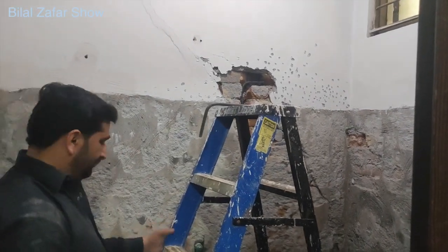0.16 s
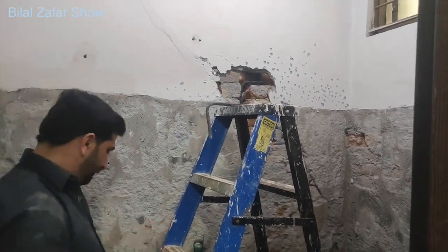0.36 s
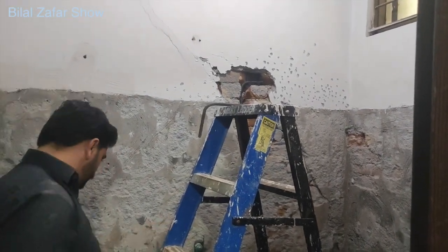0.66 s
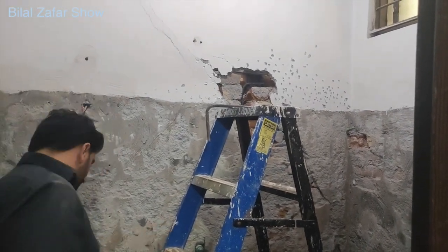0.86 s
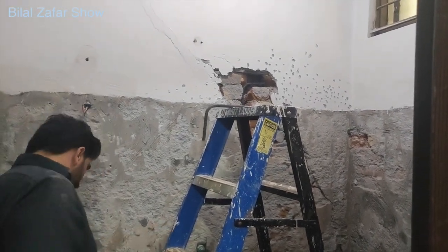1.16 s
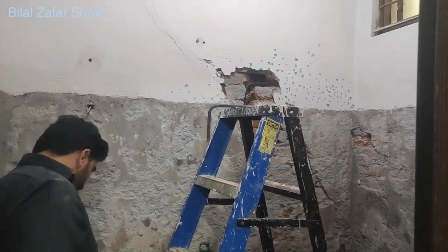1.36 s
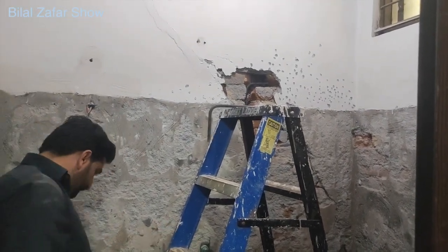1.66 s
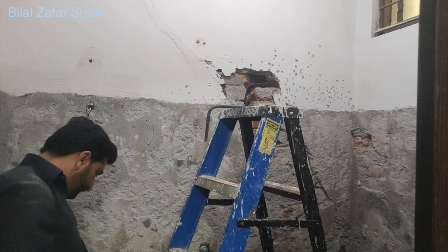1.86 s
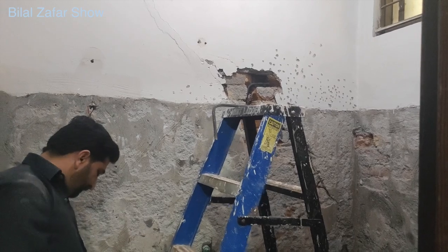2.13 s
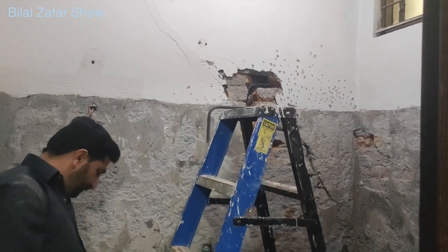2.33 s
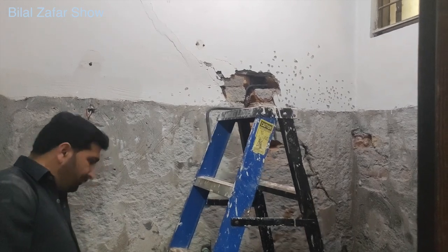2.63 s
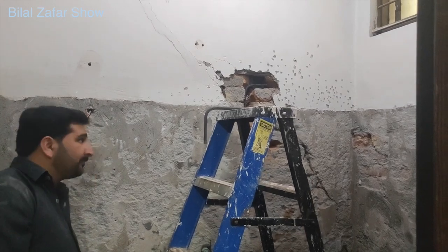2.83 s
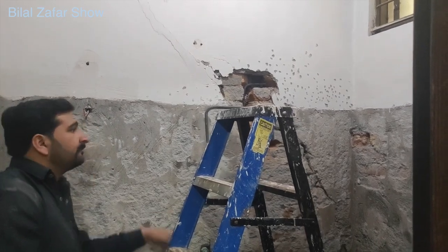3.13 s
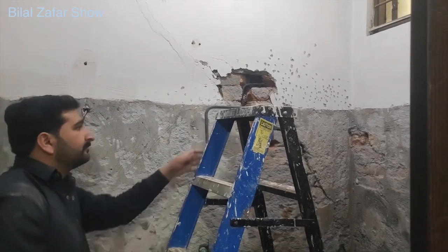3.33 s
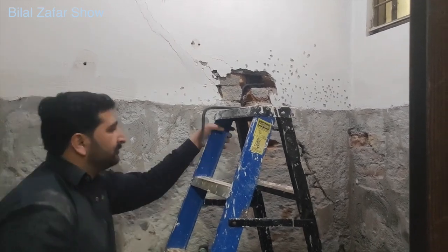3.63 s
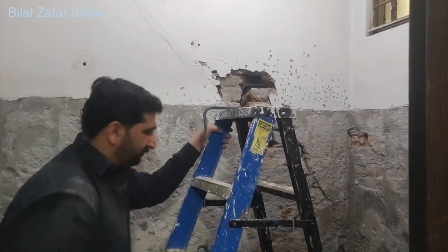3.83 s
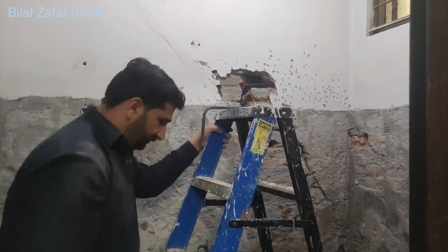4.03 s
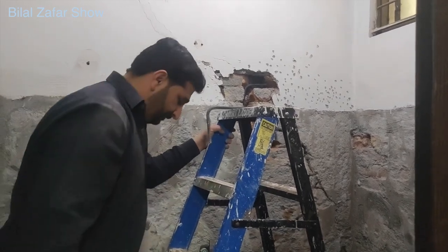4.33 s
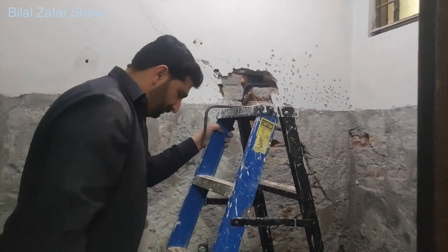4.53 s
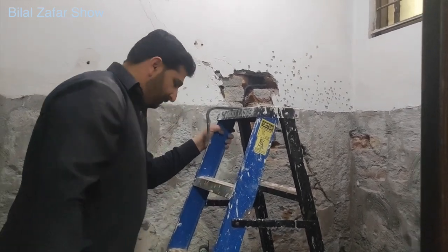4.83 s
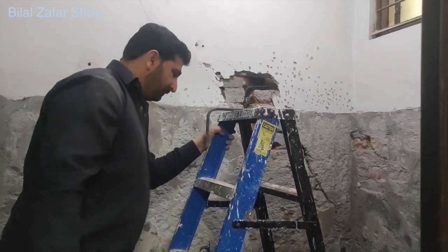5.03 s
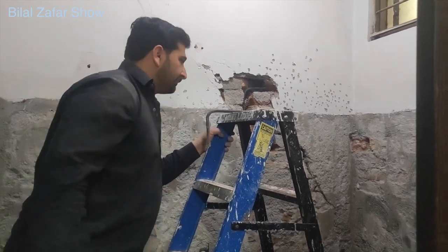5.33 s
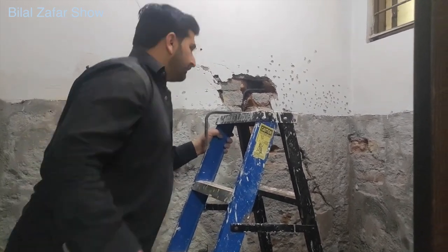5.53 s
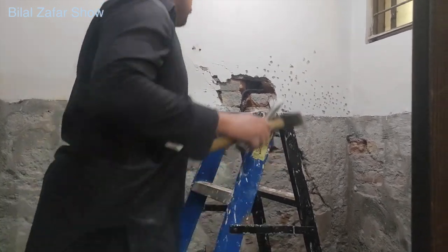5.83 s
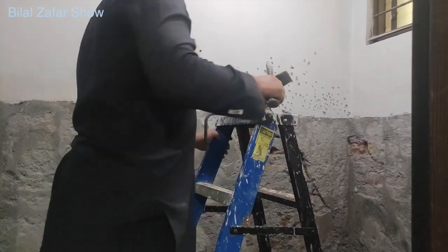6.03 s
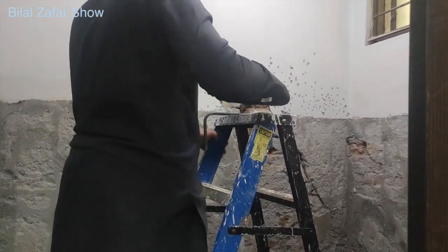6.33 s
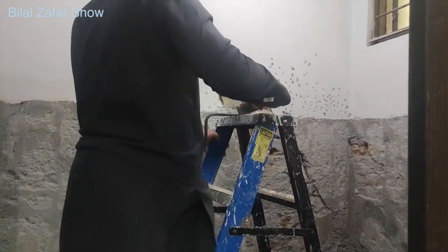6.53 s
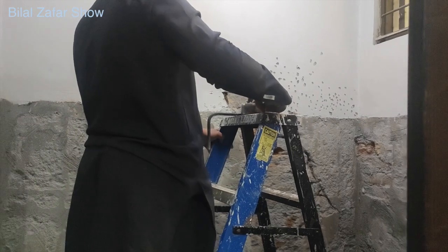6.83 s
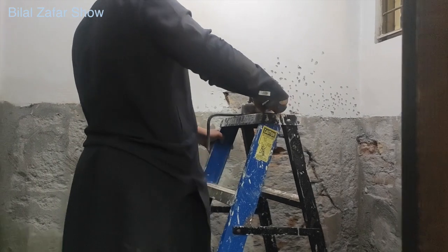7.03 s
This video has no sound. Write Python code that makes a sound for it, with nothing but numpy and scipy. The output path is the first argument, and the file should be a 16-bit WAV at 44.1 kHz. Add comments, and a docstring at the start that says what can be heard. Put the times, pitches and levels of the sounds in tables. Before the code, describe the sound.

Gritty scrapes echo off hard walls as someone picks a hammer and chisel out of rubble across a small room. The microphone is lightly bumped and something creaks twice beside it. After a heavy thud and a stepladder's clack come a faint squeak, a shoe scuff and light clinking. The tools are then laid on the ladder with a scraping, ringing clatter, over a low room rumble.

```python
"""A small, bare masonry room in stereo; the hard walls draw out all but the closest sounds.
Across the room a man gathers hammer and chisel from the rubble: steel and brick bits tip and scrape.
Right at the microphone the housing is bumped and something creaks twice. Something heavy thuds, then
a stepladder clacks. A thin squeak and a scuffing sole follow, and the tools clink in his hand.
Last he lays them on the ladder: they scrape and rattle, the chisel sings and the top plate rings."""
import sys
import numpy as np
from scipy import signal
from scipy.fft import rfft, irfft
from scipy.io import wavfile
from scipy.ndimage import uniform_filter1d

SR = 44100
rng = np.random.default_rng(int(sys.argv[2]) if len(sys.argv) > 2 else 0)


def file_out(sig):
    """Save sig as 16-bit WAV at sys.argv[1]."""
    # one column per channel
    cols = np.atleast_2d(sig).T
    # limit, then scale
    lim = np.clip(cols, -1, 1)
    pcm = np.round(lim * 32767).astype(np.int16)
    wavfile.write(sys.argv[1], SR, pcm)


N = 316197
TIME = np.arange(N) / SR
SECOND = TIME[:SR]
SAMPLES_50_MS = int(.05 * SR)

# Levels in the tables are at the source, ahead of room, mix gains and microphone.
# the building's rumble and hiss: freq_hz, gain_db
ROOM_TONE = [(15, -1), (25, -7), (223, -21), (256, -22.5), (659, -29.5), (911, -28.5), (1160, -26.5),
             (1260, -29), (3340, -33), (4140, -40), (7920, -33.5), (9840, -40.5), (16000, -38.5)]
# decay between the bare walls: freq_hz, t60_s
ROOM_DECAY = [(100, 0.64), (350, 0.9), (1000, 0.76), (2500, 0.53), (5000, 0.37), (8000, 0.33),
              (15000, 0.17)]
# how alike diffuse sound is left and right: freq_hz, correlation
STEREO_LIKENESS = [(60, 0.26), (130, 0.91), (330, 0.89), (700, 0.59), (1400, 0.0042), (2500, 0)]
# colour of the two microphone ports: freq_hz, gain_db
LEFT_PORT = [(330, 0), (620, -0.5), (930, 3.5), (1350, -4), (2000, -4), (2800, 2), (5500, -1), (6700, 5.5),
             (7650, 16.5), (8500, 11.5), (9600, 6.5), (10600, 1)]
RIGHT_PORT = [(930, 0), (1400, 1.5), (2000, -1), (2800, -1.5), (4100, -7), (5200, -7.5), (6300, -3.5),
              (7200, 5), (8000, -49), (9200, -8), (11000, -8)]
# bumps on the microphone's housing: start_s, level_db
HOUSING_BUMPS = [(.102, -40.5), (.152, -38.5), (.641, -38), (1.831, -31)]

# a sole scuffs the dusty floor: start_s, level_db, slide_s
SCUFFS = [(5.319, -33.5, 0.049), (5.365, -32, 0.021)]
# colour of sole on dust: freq_hz, gain_db
SOLE_COLOUR = [(100, -27), (330, -6), (650, -13.5), (1000, -6.5), (1350, 3.5), (1900, -6.5), (3500, -17),
               (12000, -34.5)]
# course of the thin squeak: time_s, pitch_hz, level_db
SQUEAK_PATH = [(4.929, 3700, -88), (4.989, 3625, -50), (5.07, 3540, -53.5), (5.15, 3540, -78)]
# speed of the creak, one list for each of its two strokes: time_s, slips_per_s
CREAK_STROKES = [
    [(1.074, 112), (1.15, 70), (1.22, 44), (1.27, 47), (1.32, 88), (1.41, 198), (1.47, 191), (1.59, 48),
     (1.645, 12)],
    [(1.796, 20.5), (1.895, 35), (1.96, 23), (2.05, 12)],
]
# resonances of the creaking body: freq_hz, width_hz, gain_db
CREAK_BODY = [(2880, 3800, 0.5), (4300, 600, 7), (6060, 570, 5.5), (7760, 210, 3), (9500, 1000, 3)]
# the heavy thud and its rebounds: start_s, level_db
THUDS = [(2.629, -7), (2.660, -8), (2.732, -12), (2.772, -22), (2.822, -22)]
# modes of the thud: pitch_hz, gain_db, t60_s
THUD_MODES = [(182, -10, 0.26), (217.5, 0, 0.21), (267, -5.5, 0.08), (377, -1.5, 0.045), (468, -4, 0.12),
              (486, -12, 0.046)]

# colour of steel on brick: freq_hz, gain_db
GRIT_COLOUR = [(50, -12.5), (150, -4), (300, -3.5), (650, -6), (950, -4), (1700, 0.5), (2700, -3),
               (4200, -8), (9000, -15.5), (16000, -14.5)]
# tools and rubble shift on the floor: start_s, level_db, slide_s, hardness_db (treble gained)
RUBBLE_SHIFTS = [(0.0, -27.5, 0.016, -8.5), (0.173, -29.5, 0.016, -7.5), (0.2606, -25.5, 0.0099, 3),
                 (.600, -28, 0.086, 3.5), (.935, -35.5, 0.021, 1.5), (1.723, -26.5, 0.022, 1.5),
                 (2.082, -19, 0.044, -1), (2.222, -21.5, 0.049, 2), (2.297, -23.5, 0.019, -2),
                 (2.483, -32, 0.028, 8), (2.657, -22.5, 0.023, -1), (3.158, -35.5, .026, 1),
                 (3.404, -34.5, 0.031, 4.5), (3.628, -30, 0.031, 5.5), (4.028, -39, 0.018, 1),
                 (4.545, -32, 0.021, 4.5), (4.810, -42, .015, 2.5), (5.050, -42.5, 0.017, 0.5),
                 (5.370, -33.5, .022, 5.5)]
# slow, dull shuffles through the grit: start_s, level_db, slide_s
SHUFFLES = [(1.105, -37, 0.29), (1.46, -39, 0.2), (1.988, -32, .1), (2.31, -31.5, 0.044),
            (3.10, -43.5, .06), (3.57, -39.5, 0.12), (5.645, -39, 0.039), (6.478, -41.5, 0.22)]

# resonances of the ladder's hollow rails: freq_hz, width_hz, gain_db
RAIL_RESONANCES = [(331, 36, 2.5), (882, 32, 3.5)]
# the ladder's frame clacks: start_s, level_db
CLACKS = [(3.771, -24), (3.776, -12.5)]
# resonances of the frame: freq_hz, width_hz, gain_db
FRAME_RESONANCES = [(495, 117, -4), (923, 34, 2), (991, 70, 4.5), (1300, 270, -3.5), (1742, 42, 2),
                    (2225, 120, -3), (2560, 61, -12), (3380, 180, -11.5), (5430, 3500, -31)]
# hammer and chisel touch in the hand: start_s, level_db
CLINKS = [(5.915, -54), (6.153, -61.5)]
# their ring: pitch_hz, gain_db, t60_s
CLINK_MODES = [(1920, 3, 0.45), (7750, -1, .12)]
# the chisel sings as it slides: start_s, level_db
CHISEL_RINGS = [(6.724, -35.5), (6.745, -31), (6.768, -31.5)]
# its one mode: pitch_hz, gain_db, t60_s
CHISEL_MODE = [(5421, 0, .06)]
# steel edges catch on the ladder's gritty top: start_s, level_db, slide_s, hardness_db (treble gained)
SCRAPES = [(6.573, -19.5, 0.024, -4.5), (6.669, -20, 0.016, 0), (6.735, -17, 0.069, -1.5),
           (6.842, -15.5, 0.026, 4), (6.928, -16, 0.014, 7), (7.022, -24, 0.018, 1.5),
           (7.163, -21.5, 0.008, -3)]
# tools land on the ladder's top: start_s, level_db
LANDINGS = [(6.577, -34), (6.625, -24), (6.85, -24), (6.89, -18.5), (6.932, -13)]
# modes of the top plate: pitch_hz, gain_db, t60_s (shortened in ladder_top)
PLATE_MODES = [(236.4, -4.0, 0.48), (344.4, 8.5, 0.74), (457.0, -2.0, 0.81), (717, -11, 0.32),
               (897, -6.5, 0.55), (978, -1, 0.39), (1280, -4.5, 0.43), (1380, -10, 0.4), (395.6, -3, 0.73)]


def undb(db):
    """Decibels to gain."""
    return 10 ** (np.asarray(db) / 20)


def along(points, hz):
    """Read (freq_hz, value) points on a log-frequency axis."""
    freqs, values = np.transpose(points)
    return np.interp(np.log(np.maximum(hz, 1)), np.log(freqs), values)


def level(x, db):
    """Scale a short sound to the energy of 50 ms at this level."""
    return x * undb(db) * np.sqrt(SAMPLES_50_MS / np.sum(x ** 2))


def add(out, start_s, x):
    """Mix a short sound in at start_s."""
    i = int(np.clip(start_s * SR, 0, N - 1))
    out[i:i + len(x)] += x[:N - i]


def colour(x, points, size=2048):
    """Minimum-phase filter through (freq_hz, gain_db) points."""
    gain = undb(along(points, np.fft.rfftfreq(size, 1 / SR)))
    cepstrum = irfft(np.log(gain))
    cepstrum[1:size // 2] *= 2
    cepstrum[size // 2 + 1:] = 0
    impulse = irfft(np.exp(rfft(cepstrum)))
    return signal.fftconvolve(x, impulse)[:len(x)]


def resonate(x, peaks):
    """Parallel resonances, each (freq_hz, width_hz, gain_db)."""
    return sum(undb(db) * signal.lfilter(*signal.iirpeak(hz, hz / width_hz, fs=SR), x)
               for hz, width_hz, db in peaks)


def radiate(x, low_hz):
    """A body of limited size sends out little below low_hz."""
    return signal.sosfilt(signal.butter(3, low_hz, "high", fs=SR, output="sos"), x)


def strike(blows, modes, push_s, detune=.001):
    """Each blow rings the modes, a hair out of tune; a longer push dulls the attack."""
    out = np.zeros(N)
    push = np.hanning(int(push_s * SR) + 3)
    for start_s, db in blows:
        ring = 0
        for hz, mode_db, t60_s in modes:
            phase = 2 * np.pi * hz * (1 + detune * rng.standard_normal()) * SECOND
            ring += undb(mode_db) * np.sin(phase) * np.exp(-np.log(1000) * SECOND / t60_s)
        add(out, start_s, level(signal.fftconvolve(ring, push), db))
    return out


def grind(slide_s, grains_per_s=2500, spread_db=5.5, bite=2.1, swell=0):
    """A first bite, then grains break as the surfaces slide, loudest after the share swell of slide_s."""
    t = SECOND[:SR // 3]
    breaks = rng.random(len(t)) < grains_per_s / SR
    signs = rng.choice([-1, 1], len(t))
    sizes = undb(spread_db * np.minimum(rng.exponential(size=len(t)), 4))
    grains = breaks * signs * sizes
    grains[0] = 2 * bite
    return grains * np.exp(-(t / slide_s - swell) ** 2)


def crunch(db, slide_s, bass_db, treble_db, bite=1.3, swell=0):
    """Grit crushed under a sliding thing; heavy things add bass, small hard ones treble."""
    tilt = [(300, bass_db), (900, 0), (2000, 0), (7000, treble_db)]
    tone = [(hz, grit_db + along(tilt, hz)) for hz, grit_db in GRIT_COLOUR]
    grains = grind(slide_s, grains_per_s=560, bite=bite, swell=swell)
    return level(colour(grains, tone), db)


def diffuse_noise(size):
    """Noise from all sides of the microphone: alike left and right in the bass, unrelated in the treble."""
    likeness = np.clip(along(STEREO_LIKENESS, np.fft.rfftfreq(size, 1 / SR)), 0, .995)
    mid, side = rfft(rng.standard_normal((2, size)))
    mid *= np.sqrt((1 + likeness) / 2)
    side *= np.sqrt((1 - likeness) / 2)
    return irfft(np.array([mid + side, mid - side]), size)


def room_tone(level_db=-44.5):
    """The quiet rumble and hiss of the building, all around."""
    noise = np.array([colour(channel, ROOM_TONE) for channel in diffuse_noise(N)])
    return noise * undb(level_db) / np.std(noise)


def room(x, direct=0.37, early=0.33, early_s=0.075):
    """Bare walls at a distance: some direct sound, dense early echoes, a tail whose treble dies first."""
    spectrum = rfft(diffuse_noise(SR))
    hz = np.fft.rfftfreq(SR, 1 / SR)
    tail = 0
    for band_hz, t60_s in ROOM_DECAY:
        band = along([(f, float(f == band_hz)) for f, _ in ROOM_DECAY], hz)
        tail += irfft(spectrum * band, SR) * np.exp(-np.log(1000) * SECOND / t60_s)
    tail *= 1 + early * np.exp(-SECOND / early_s)
    tail *= 1 - np.exp(-SECOND / 0.0009)  # echoes take a moment to build
    tail /= np.sqrt(np.sum(tail ** 2) / 2)
    tail[:, 0] += direct
    return signal.fftconvolve(x[None], tail, axes=1)[:, :N]


def housing_bumps():
    """Dull, dry knocks on the microphone's own housing."""
    modes = [(85.5, -0.5, .05), (223, 3, 0.013), (580, 8.5, 0.0083)]  # pitch_hz, gain_db, t60_s
    return radiate(strike(HOUSING_BUMPS, modes, push_s=0.00052), low_hz=51.3)


def squeak(waver=0.011):
    """A faint, rough friction tone that sinks."""
    times, hz, db = np.transpose(SQUEAK_PATH)
    wobble = uniform_filter1d(rng.standard_normal(N), size=120)
    pitch_hz = np.interp(TIME, times, hz) * (1 + waver * wobble / np.std(wobble))
    envelope = np.interp(TIME, times, undb(db), left=0, right=0)
    return envelope * np.sin(2 * np.pi * np.cumsum(pitch_hz) / SR)


def shoe():
    """A sole drags over dust."""
    out = np.zeros(N)
    for start_s, db, slide_s in SCUFFS:
        add(out, start_s, level(colour(grind(slide_s), SOLE_COLOUR), db))
    return out


def slips(stroke, slow_per_s=27, slow_db=-39.5, db_per_octave=-2):
    """One stroke's slips as (start_s, level_db); slow ones store more strain and let go harder."""
    times, rate = np.transpose(stroke)
    count = np.cumsum(np.interp(TIME, times, rate, left=0, right=0)) / SR
    starts = TIME[1:][np.diff(np.ceil(count)) > 0]
    octaves_faster = np.log2(np.interp(starts, times, rate) / slow_per_s)
    return np.column_stack([starts, slow_db + db_per_octave * octaves_faster])


def creak(body=0.39, body_s=0.002, chatter=0.064, jitter_s=0.0002, grip_db=-9, grip_s=0.048):
    """Stick-slip by the microphone: slips speed up, slow to lone ticks and all shake one small body."""
    starts, levels_db = np.vstack([slips(stroke) for stroke in CREAK_STROKES]).T
    levels_db += grip_db * np.exp(-(starts - starts[0]) / grip_s)  # weaker until the surfaces grip
    starts += jitter_s * rng.standard_normal(len(starts))
    fade = np.exp(-SECOND[:SAMPLES_50_MS] / body_s)
    reflections = body * rng.standard_normal(SAMPLES_50_MS)
    out = np.zeros(N)
    for start_s, db in zip(starts, levels_db):
        slip = (reflections + chatter * rng.standard_normal(SAMPLES_50_MS)) * fade
        slip[0] += 2  # the snap of letting go
        add(out, start_s, level(resonate(slip, CREAK_BODY), db))
    return colour(out, [(10000, 2.5), (10900, -13)])


def heavy_thud():
    """A soft, weighty blow that rebounds a few times and leaves a deep shudder."""
    ring = radiate(strike(THUDS, THUD_MODES, push_s=0.0024), low_hz=148)
    shudder = strike(THUDS[:2], modes=[(32.0, 0, 0.97)], push_s=0.023)
    return undb(-7.5) * ring + undb(-19.0) * room(ring) + undb(-25.5) * shudder


def floor_grit(crumb_fall_s=.185, crumb_db=-17, crumb_slide_s=0.022):
    """Pieces tip, grind and each shed a crumb that lands a moment later; feet shuffle between them."""
    out = np.zeros(N)
    for start_s, db, slide_s, hardness_db in RUBBLE_SHIFTS:
        bass_db = -0.5 - 0.23 * hardness_db  # the harder a piece, the less bass it gives
        add(out, start_s, crunch(db, slide_s, bass_db, hardness_db, bite=1.0, swell=0.34))
        add(out, start_s + crumb_fall_s, crunch(db + crumb_db, crumb_slide_s, bass_db, hardness_db))
    for start_s, db, slide_s in SHUFFLES:
        add(out, start_s, crunch(db, slide_s, bass_db=8, treble_db=-3, bite=0.93, swell=0.1))
    return out


def tool_grit(tick_db=13):
    """The dusty tools tick brightly at each clink, scrape over the ladder's top and rattle as they land."""
    out = np.zeros(N)
    for start_s, db in CLINKS:
        add(out, start_s, crunch(db + tick_db, slide_s=0.0021, bass_db=-11, treble_db=16))
    for start_s, db, slide_s, hardness_db in SCRAPES:
        add(out, start_s, crunch(db, slide_s, bass_db=-6, treble_db=hardness_db))
    for start_s, db in LANDINGS:
        rattle_db = -11.5 + 0.41 * db  # the rattle grows more slowly than the blow
        add(out, start_s, crunch(rattle_db, slide_s=0.025, bass_db=-5.5, treble_db=-19, swell=0.51))
    return out


def rubble(spots=3):
    """Grit breaks at several spots across the room, each with its own echoes."""
    heard = sum(room(floor_grit() + tool_grit(), direct=0.25, early=1.0, early_s=0.0031)
                for _ in range(spots))
    return heard / np.sqrt(spots)


def ladder_frame(contact_s=0.0038, legs=2):
    """Loose joints knock home as the ladder takes a hand's weight; each leg has its own echoes."""
    leg_colour = [(250, -3.5), (450, -4.5), (5500, -1.5), (8000, -13.5), (14000, -10)]
    heard = 0
    for _ in range(legs):
        leg = np.zeros(N)
        for start_s, db in CLACKS:
            knock = resonate(grind(contact_s, bite=4.4), FRAME_RESONANCES)
            add(leg, start_s, level(knock, db))
        heard += room(colour(leg, leg_colour), direct=0.25, early=0.42, early_s=0.17)
    return heard / np.sqrt(legs)


def steel_tools():
    """The chisel clinks against the hammer, and sings as it slides."""
    singing = strike(CHISEL_RINGS, CHISEL_MODE, push_s=.0001)
    clinking = strike(CLINKS, CLINK_MODES, push_s=.0001)
    ring = singing + clinking
    return undb(-5) * ring + undb(-3) * room(ring)


def ladder_top(shortening=1.18):
    """The top plate rings briefly under the landing tools."""
    modes = [(hz, db, t60_s / shortening) for hz, db, t60_s in PLATE_MODES]
    ring = radiate(strike(LANDINGS, modes, push_s=0.00047), low_hz=276)
    return undb(4.5) * ring + undb(-10.5) * room(ring)


def scene():
    """Far sounds reach the microphone mostly off the walls; creak and bumps are close and nearly dry."""
    bumps = housing_bumps()
    creaking = creak()
    far = rubble() + room(shoe() + squeak() + undb(-12) * creaking)
    far += resonate(far, RAIL_RESONANCES)  # the ladder's hollow rails hum along
    left, right = far + ladder_frame() + ladder_top() + steel_tools() + heavy_thud() + bumps
    through_ports = np.array([colour(left, LEFT_PORT), colour(right, RIGHT_PORT)])
    through_housing = undb(-10.0) * creaking  # misses the colour of the ports
    return through_ports + through_housing + room_tone()


def record(dry):
    """The recorder clips any peak over full scale and cuts the treble above 16 kHz."""
    lowpass = signal.ellip(10, .2, 70, 16000, fs=SR, output="sos")
    return signal.sosfilt(lowpass, np.clip(dry, -1, 1))


dry = scene()
out = record(dry)
file_out(out)
```